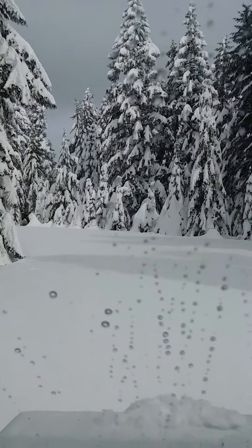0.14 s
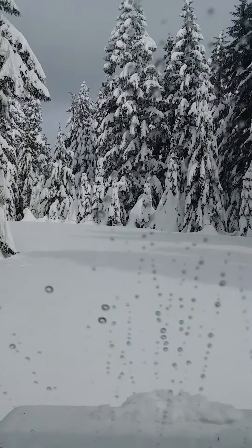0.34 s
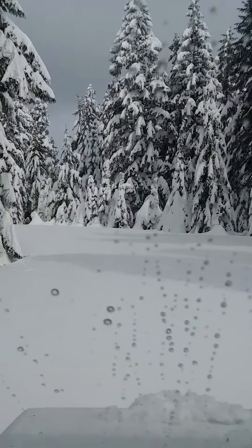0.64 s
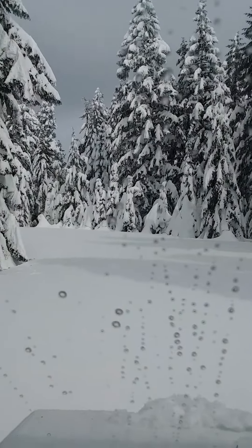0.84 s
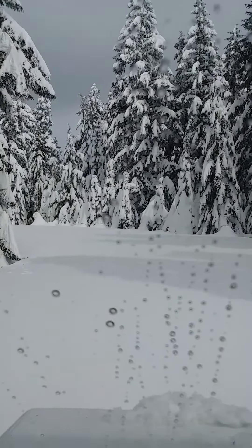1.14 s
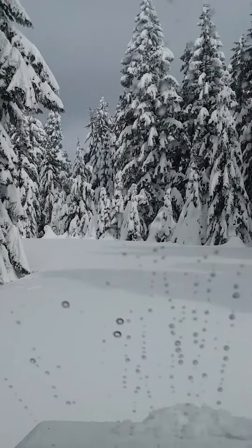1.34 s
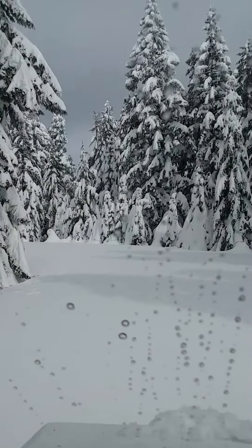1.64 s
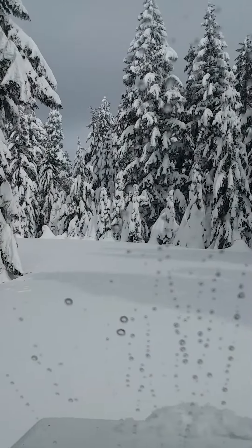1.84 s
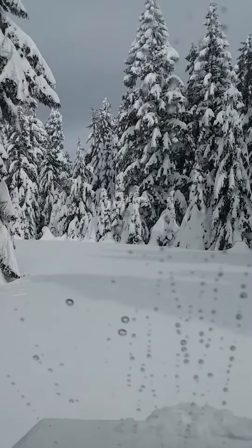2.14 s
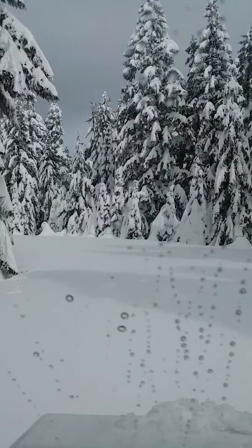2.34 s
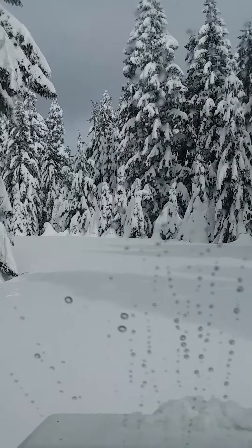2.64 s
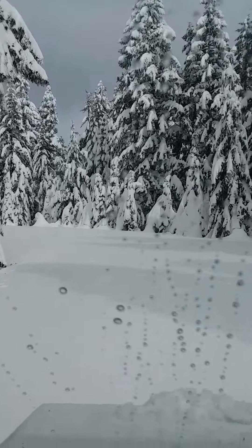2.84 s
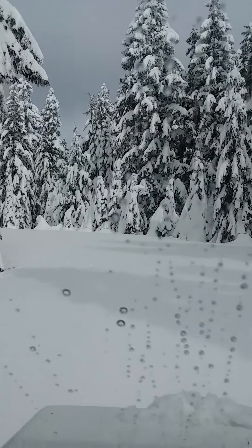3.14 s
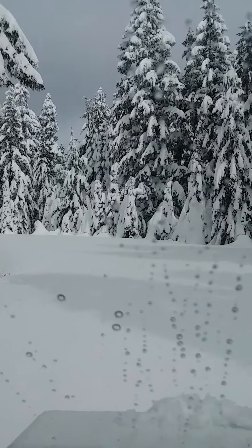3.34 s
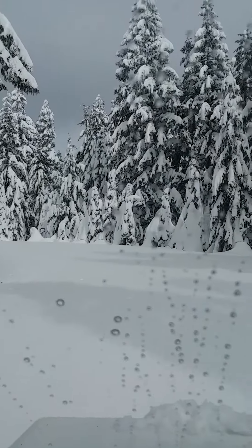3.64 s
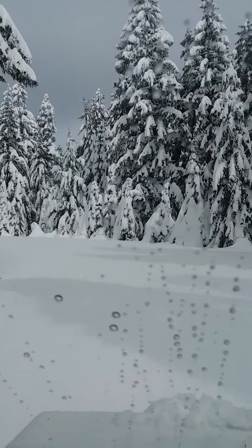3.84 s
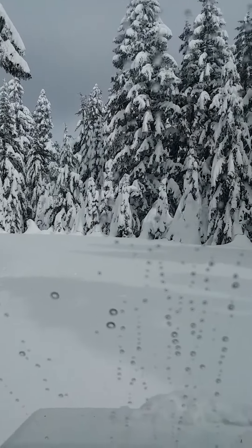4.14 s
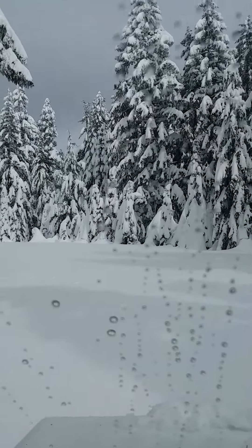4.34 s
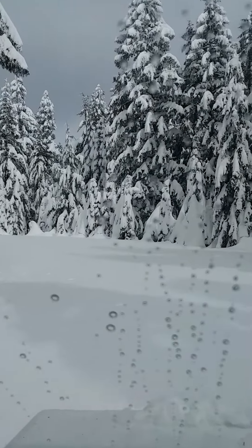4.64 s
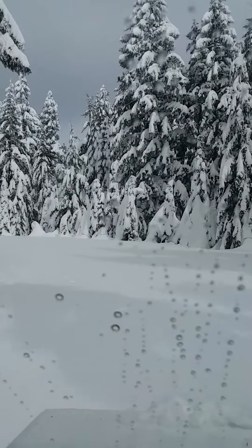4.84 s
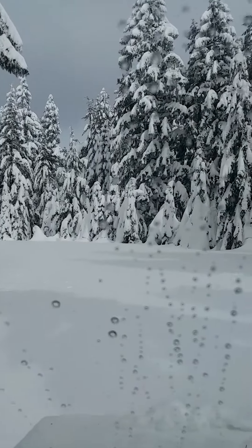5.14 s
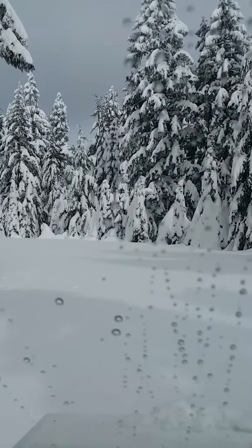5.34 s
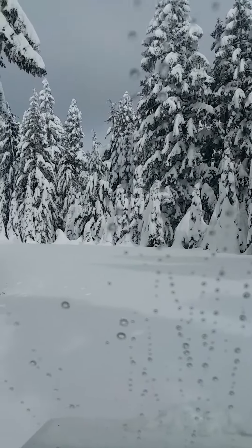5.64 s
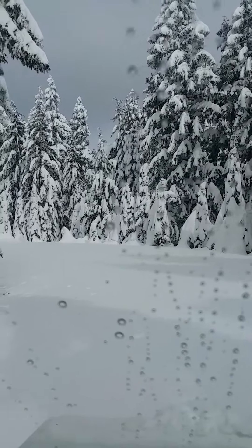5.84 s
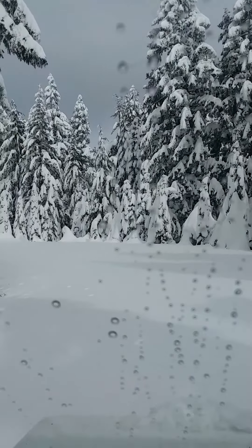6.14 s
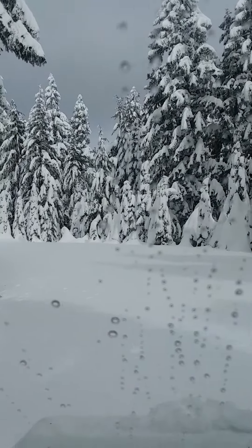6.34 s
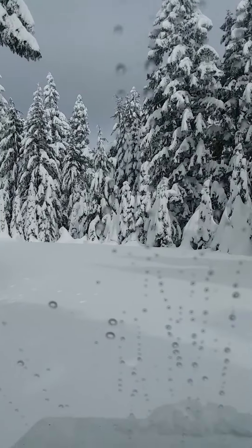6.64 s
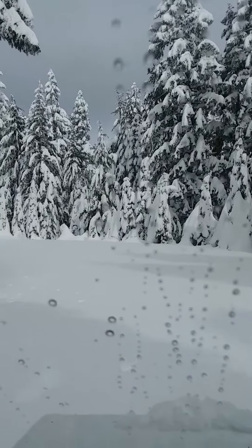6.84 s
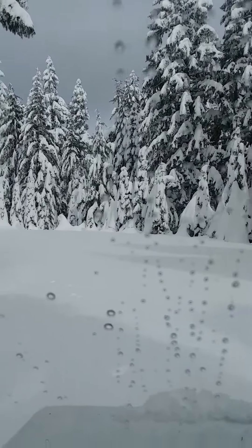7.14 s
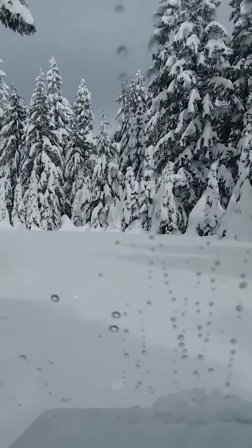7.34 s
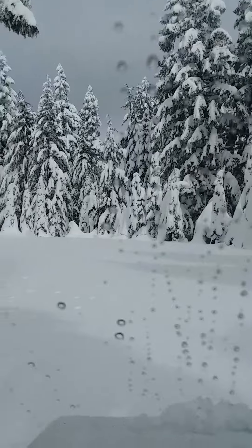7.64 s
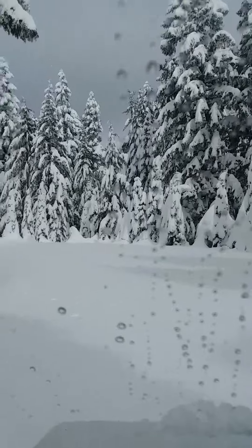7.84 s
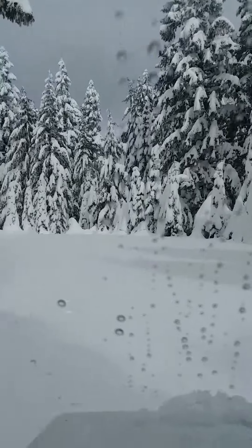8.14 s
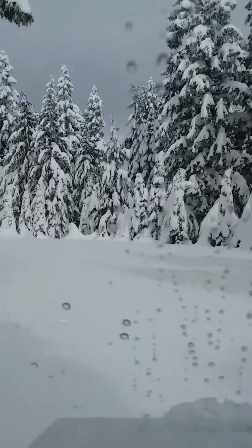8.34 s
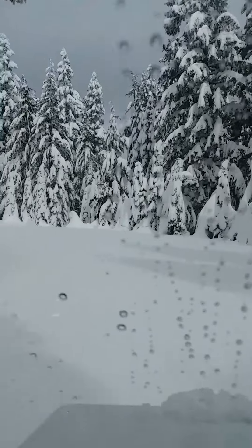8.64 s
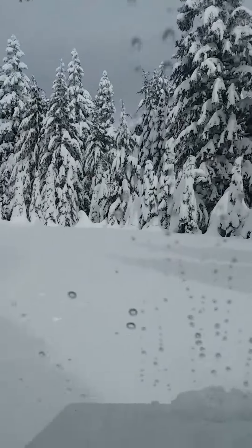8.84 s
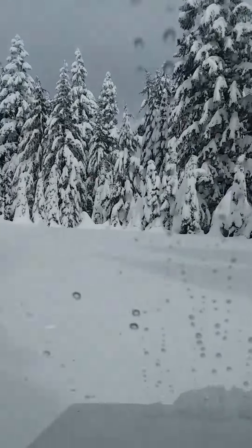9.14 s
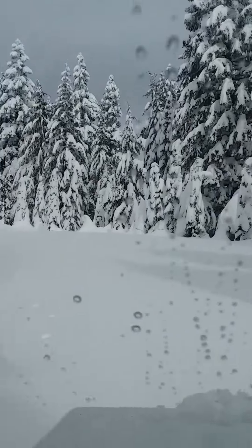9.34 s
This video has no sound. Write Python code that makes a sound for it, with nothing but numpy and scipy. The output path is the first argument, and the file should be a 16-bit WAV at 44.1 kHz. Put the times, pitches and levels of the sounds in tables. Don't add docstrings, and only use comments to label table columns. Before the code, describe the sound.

A heavy, steady engine drone fills a closed cab crawling through deep snow, with bassy track rumble, soft jolts and ringing panels.

```python
import sys
import numpy as np
from scipy import signal
from scipy.fft import rfft, irfft, next_fast_len
from scipy.io import wavfile
from scipy.ndimage import uniform_filter1d, minimum_filter1d

SR = 44100
rng = np.random.default_rng(int(sys.argv[2]) if len(sys.argv) > 2 else 0)


def transcribe(signal):
    frames = np.atleast_2d(signal).T
    limited = np.clip(frames, -1, 1)
    pcm = np.round(limited * 32767).astype(np.int16)
    wavfile.write(sys.argv[1], SR, pcm)


def convert_level_to_amplitude(level_db):
    exponent = np.asarray(level_db, float) / 20
    return 10 ** exponent


N = 418950
SLOW_STEP = 40


def rms_one(x):
    return x / np.sqrt(np.mean(x ** 2) + 1e-20)


def at_hz(points, hz):
    point_hz, value = np.transpose(points)
    return np.interp(np.log(hz), np.log(point_hz), value)


def drift(rate_hz):
    r = np.exp(-2 * np.pi * rate_hz * SLOW_STEP / SR)
    noise = rng.standard_normal(N // SLOW_STEP + 2002)
    slow = signal.lfilter([1], [1, -2 * r, r * r], noise)[2000:]
    return np.interp(np.arange(N) / SLOW_STEP, np.arange(len(slow)), rms_one(slow - slow.mean()))


def resonance(x, hz, width_hz):
    r = np.exp(-np.pi * width_hz / SR)
    poles = [1, -2 * r * np.cos(2 * np.pi * hz / SR), r * r]
    return signal.lfilter(np.array([1, 0, -1]) * (1 - r * r) / 2, poles, x)


def coloured_noise(spectrum, shared_db, own_db, count):
    # f/Hz, likeness (0 to 1)
    likeness = [(30, 0.79), (60, 0.97), (130, 0.99), (290, 0.83), (640, 0.11), (1410, 0.98), (3100, 0.084),
                (6820, 0.12), (15000, 0.01)]
    # f/Hz, left over right/dB
    sides = [(35, -1), (60, 1.5), (110, -3), (200, 0.5), (380, 2), (600, 3), (1000, 1), (1300, -3.5),
             (1650, -6), (2100, -6.5), (2700, 1), (3300, 4.5), (4000, -4), (8500, -1), (14000, -1)]
    left_lag, ripple_db = 18, 0.74

    size = next_fast_len(N)
    hz = np.maximum(np.arange(size // 2 + 1) * SR / size, 1)
    mid, side = rfft(rng.standard_normal((2, size))) * convert_level_to_amplitude(at_hz(spectrum, hz))
    alike = np.clip(at_hz(likeness, hz), 0, 1)
    lean = convert_level_to_amplitude(at_hz(sides, hz) / 2)
    late = np.exp(-2j * np.pi * np.maximum(hz - 500, 0) * left_lag / SR)
    pair = np.sqrt(1 + alike) * mid + np.sqrt(1 - alike) * side * [[1], [-1]]

    bumps = rng.standard_normal((2, SR // 90))
    ripple = np.array([np.interp(hz, np.arange(0, SR, 90), b) for b in bumps])
    pair = pair * [lean * late, 1 / lean] * convert_level_to_amplitude(ripple_db * ripple)

    centres = np.log(np.geomspace(spectrum[0][0], spectrum[-1][0], count))
    together = drift(20.0)
    out = 0
    for share in np.eye(count):
        band = irfft(pair * np.interp(np.log(hz), centres, share, 0, 0), size)[:, :N]
        out = out + band * convert_level_to_amplitude(shared_db * together + own_db * drift(9.7))
    return rms_one(out)


def snow_jolts():
    # t/s, lift of the rumble/dB
    lumps = [
        (0.02, 3),
        (1.66, 0.5),
        (3.33, 0.5),
        (5.4, 1),
        (6.75, 4.0),
        (9.1, 2),
    ]
    half_length_s = 0.23
    t = np.arange(N) / SR
    return sum(lift_db * np.exp(-((t - s) / half_length_s) ** 2) for s, lift_db in lumps)


def chassis_thuds(jolt_db):
    bass = signal.butter(4, [53, 76], "band", fs=SR, output="sos")
    thuds = signal.sosfilt(bass, rng.standard_normal(N))
    return convert_level_to_amplitude(-37 + 1.5 * jolt_db) * rms_one(thuds)


def track_rumble(jolt_db):
    # f/Hz, level/dB per Hz
    spectrum = [(22, -17), (40, -24), (55, -1), (75, 2.5), (105, 0.5), (125, -2.5), (155, 2), (195, 2),
                (225, -1), (260, -3), (320, -10.5), (430, -9), (500, -23.5), (900, -26)]
    return convert_level_to_amplitude(-16.5 + jolt_db) * coloured_noise(spectrum, shared_db=-0.2, own_db=0.75, count=6)


def cab_roar(turn):
    # f/Hz, level/dB per Hz
    spectrum = [(330, -52), (520, -7), (850, -9.5), (1130, -12), (1600, -14), (2100, -15), (3300, -25),
                (4200, -27), (6100, -31.5), (8600, -32.5), (9500, -41.5), (11300, -38), (12800, -35),
                (16500, -37)]
    roar = convert_level_to_amplitude(-29) * coloured_noise(spectrum, shared_db=0.9, own_db=0.5, count=10)
    return roar * (1 + 0.043 * np.cos(turn + 1.7))


def ringing_panels(turn):
    # f/Hz, width/Hz, left level/dB, right level/dB, lateness of left/samples
    cab = [(445, 67, 0, -2, -8.5), (555.3, 36, -4, -6.5, -3), (635, 58, -10, -10.5, -4),
           (741.4, 56, -8, -8, -5), (843.6, 29, 0, -1, 17), (907.4, 66, -4, 0.5, 18),
           (952.5, 46, 0, 1.5, 15.5), (998, 91, -11, -9, 11), (1084, 90, -6, -9.5, 21),
           (1250, 81, -4, 0.1, 23.5), (1321, 52, -10, -8.5, 33), (1437, 92, -3, -1.5, 25),
           (1579.4, 82, -10.5, 0.1, 26), (1780, 99, -18.5, -4.5, 14.5)]
    # f/Hz, width/Hz, left level/dB, right level/dB, lateness of left/samples
    trim = [(1895, 120, -14, -11, 27.2), (2003, 106, -9, -12, 20), (2230, 150, -20, -19.5, 21),
            (2497, 100, -14, -17, 14), (2666, 75, -15.5, -10.5, 20.1), (2880, 100, -18.5, -20, 19.4),
            (3023, 96, -19.5, -19.5, 16.5), (3170, 120, -26.5, -22, 19.4), (3560, 220, -28.5, -21, 15.5),
            (3737, 260, -32, -20, 18), (4566, 210, -30, -29, 20), (6870, 1000, -37, -32, 18),
            (13600, 1600, -50, -30, 17), (15680, 400, -41, -27, 19.5)]
    cylinders = [-6, 1, -3, 3]

    firing = np.floor(turn / (2 * np.pi)).astype(int)
    count = firing[-1] + 1
    strength_db = np.resize(cylinders, count) + 2.5 * rng.standard_normal(count)
    knocks = convert_level_to_amplitude(-13) * rms_one(np.diff(firing, prepend=0) * convert_level_to_amplitude(strength_db[firing]))
    common = rng.standard_normal((1, N))
    own = rng.standard_normal((2, N))
    own_other = rng.standard_normal((2, N))
    throb = 1 + 0.15 * np.cos(turn)
    shakes = [knocks + (common + 0.33 * own) * throb,
              knocks + (rng.standard_normal((1, N)) + 0.33 * own_other) * throb]
    out = np.zeros((2, N))
    for k, (hz, width_hz, left_db, right_db, late) in enumerate([*cab, *trim]):
        once = resonance(shakes[k % 2], hz, width_hz)
        left, right = resonance(once, hz, width_hz)
        swell_db = 0.6 * drift(4.4)
        out[0] += convert_level_to_amplitude(left_db + swell_db) * np.roll(left, round(late))
        out[1] += convert_level_to_amplitude(right_db + swell_db) * right
    return convert_level_to_amplitude(-7.5) * out


def engine_speed():
    # t/s, firing rate f/Hz, firing tone level/dB
    drive = [(0.0, 90.3, -11.5), (0.8, 89.75, -11.8), (1.4, 89.9, -12.8), (2.66, 89.5, -12.8),
             (3.2, 88.8, -12.0), (4.33, 87.2, -11.7), (5.0, 86.3, -11.3), (5.33, 85.5, -11.0),
             (5.66, 83.8, -11.0), (6.0, 82.6, -11.0), (6.3, 82.4, -10.8), (7.0, 83.3, -10.7),
             (7.7, 84.5, -11.1), (8.6, 85.4, -10.9), (9.5, 85.7, -10.7)]
    s, rate_hz, level_db = np.transpose(drive)
    t = np.arange(N) / SR
    return np.interp(t, s, rate_hz), np.interp(t, s, level_db)


def engine_tones(turn, firing_hz, tone_db):
    # multiple of firing rate, level when fast/dB, level when slow/dB, left over right/dB, left lead/rad
    orders = [(1.0, 0, 0, -.5, .25), (2.0, -1.7, -13, 1.5, -.15), (3.0, -8, -14.5, -.4, .1),
              (4.0, -22, -21.5, 1.5, -.25), (5.0, -27, -24, 3.5, 0), (6.0, -32, -30, 7.0, .2),
              (7.0, -28, -40, 4.5, -.6), (8.0, -30.5, -40, 2.5, .5), (9.0, -32, -33, 2.0, 1.0),
              (9.5, -29.5, -41, -4.0, -.8), (10.0, -27.5, -27, 3.0, -1.5), (10.5, -32, -32, 3.0, -2.0),
              (11.0, -33, -24.5, -6.5, -2.0), (12.0, -31, -39, 3.0, 1.0), (14.5, -41, -32, -4.0, 2.4),
              (16.0, -32, -42, -5.0, .9), (17.0, -38, -32, 0, .2), (4.5, -34, -29, 0, 0),
              (5.5, -33, -38, 0, 0), (6.25, -36, -33, 0, 0), (7.25, -34, -44, 0, 0), (8.25, -36, -40, 0, 0),
              (8.5, -38, -32, 0, 0), (9.75, -37, -33, 0, 0)]
    # multiple of firing rate, level when fast/dB, level when slow/dB, left over right/dB, left lead/rad
    further_tones = [(.63, -21, -23, 0, .1), (1.23, -18, -24, .5, .1), (1.75, -12.5, -17, 1.0, 0),
                     (1.855, -16, -20, 1.5, 0), (2.24, -24, -17, 0, .1), (2.78, -11.5, -13.5, 5.0, .5),
                     (2.84, -13.5, -11.5, 4.0, -.2), (3.26, -21.5, -19, -4.0, -.2), (3.5, -26, -24, -4.0, -.2),
                     (3.75, -38, -29, -2.0, 0), (5.19, -19, -24, 3.0, -.3), (5.68, -30, -39, 1.0, 0),
                     (6.52, -31, -29.5, 1.0, .3)]
    # f/Hz, width/Hz, lift/dB
    booms = [
        (331, 10, 7),
        (838, 20, 4.5),
    ]
    fast_hz, slow_hz = 87.2, 84.6

    steps = np.arange(0, N, SLOW_STEP)
    firing_hz, tone_db = firing_hz[steps], tone_db[steps]
    slow = np.clip((fast_hz - firing_hz) / (fast_hz - slow_hz), 0, 1)
    out = 0
    for multiple, fast_db, slow_db, pan_db, lead in [*orders, *further_tones]:
        wobble_db = 0.5 - 0.055 * max(fast_db, slow_db)
        boom_db = sum(db / (1 + (2 * (multiple * firing_hz - hz) / width_hz) ** 2) for hz, width_hz, db in booms)
        level_db = tone_db + boom_db + fast_db + slow * (slow_db - fast_db)
        level = np.sqrt(2) * convert_level_to_amplitude(level_db + wobble_db * drift(3.05)[steps])
        level = np.interp(np.arange(N), steps, level)
        lean = 1.2 * (multiple - 1)
        angle = multiple * turn + lean + 0.045 * wobble_db * drift(4.0)
        left = convert_level_to_amplitude(pan_db / 2) * np.cos(angle + lead / 2)
        right = convert_level_to_amplitude(-pan_db / 2) * np.cos(angle - lead / 2)
        out = out + level * np.array([left, right])
    return convert_level_to_amplitude(-0.98) * out


def scene():
    firing_hz, tone_db = engine_speed()
    turn = 2 * np.pi * np.cumsum(firing_hz) / SR
    jolt_db = snow_jolts()
    floor = chassis_thuds(jolt_db) + track_rumble(jolt_db)
    cab = cab_roar(turn) + ringing_panels(turn)
    return floor + cab + engine_tones(turn, firing_hz, tone_db)


def low_pass(x):
    return signal.sosfilt(signal.butter(12, 15780, fs=SR, output="sos"), x)


def record(dry):
    dry = dry * convert_level_to_amplitude(0.72)
    needed = np.minimum(1, 0.985 / (np.abs(dry).max(axis=0) + 1e-9))
    gain = uniform_filter1d(minimum_filter1d(needed, size=401), size=401)
    return low_pass(dry * gain)


dry = scene()
out = record(dry)
transcribe(out)
```